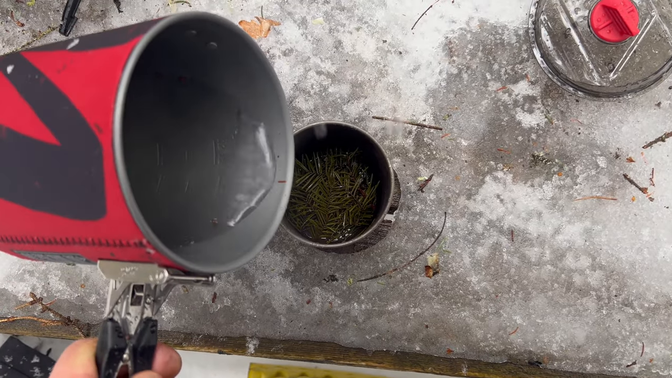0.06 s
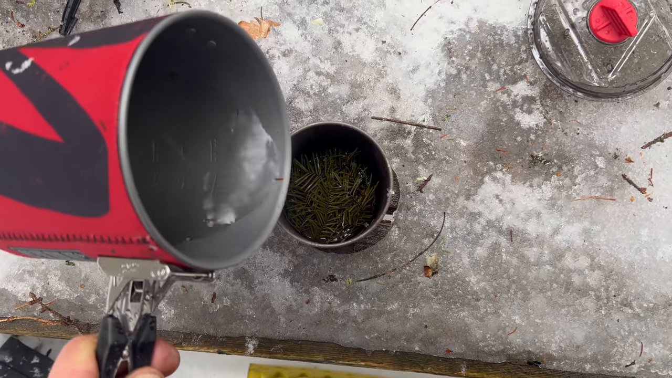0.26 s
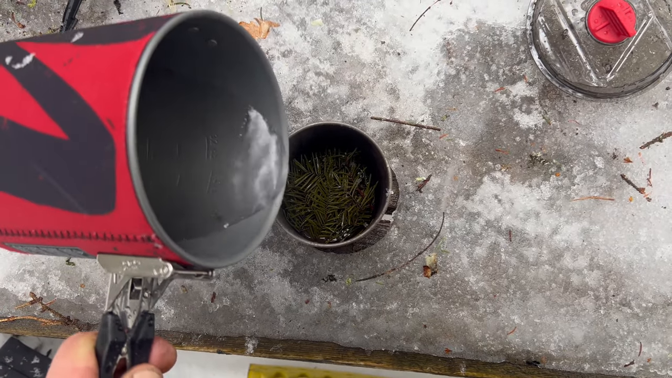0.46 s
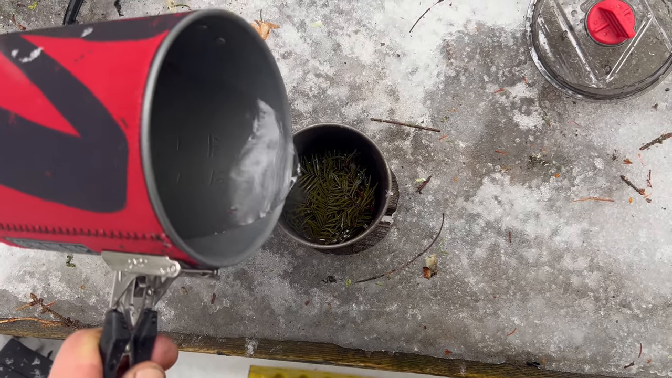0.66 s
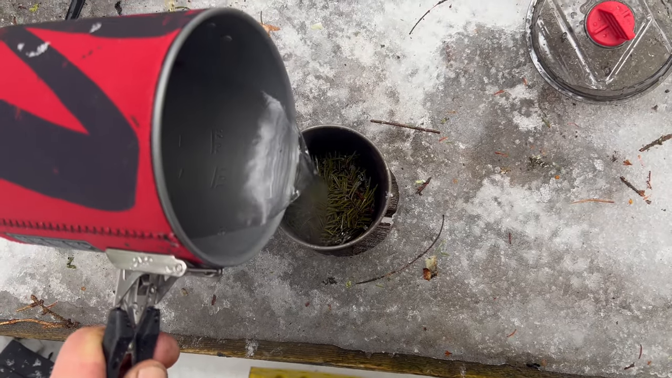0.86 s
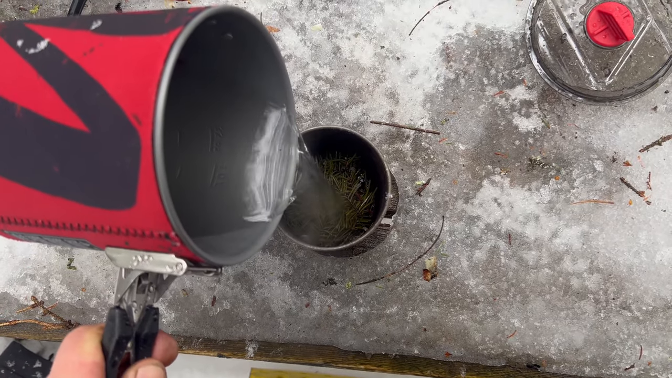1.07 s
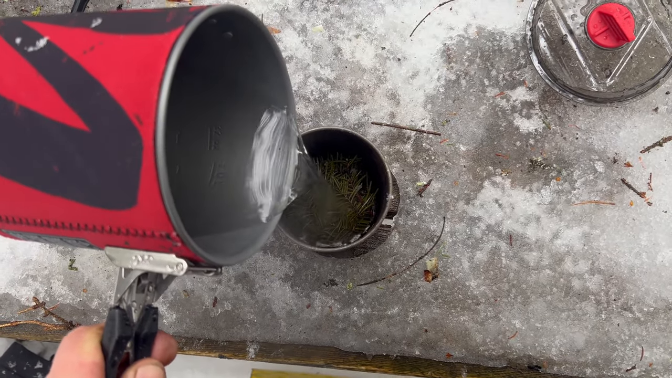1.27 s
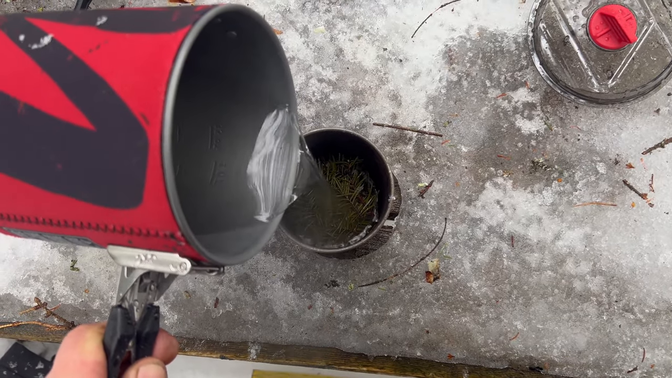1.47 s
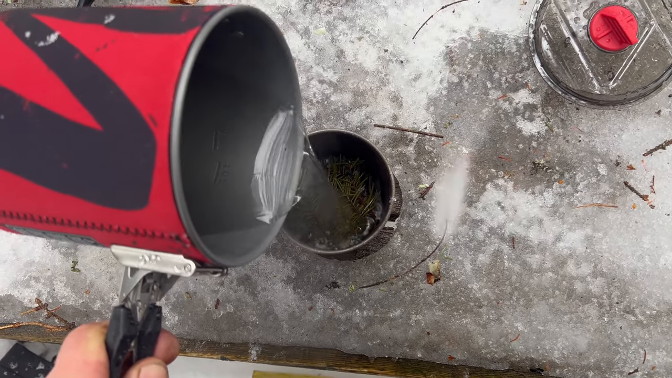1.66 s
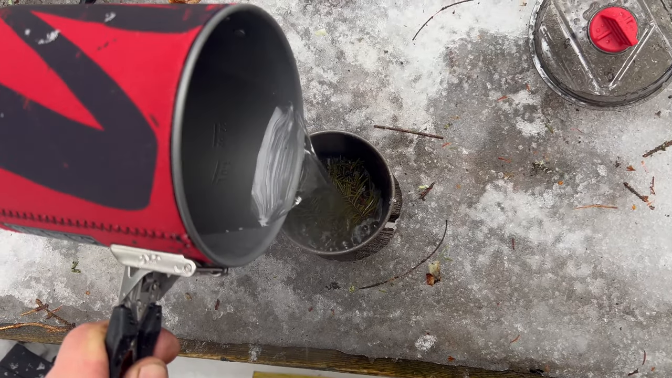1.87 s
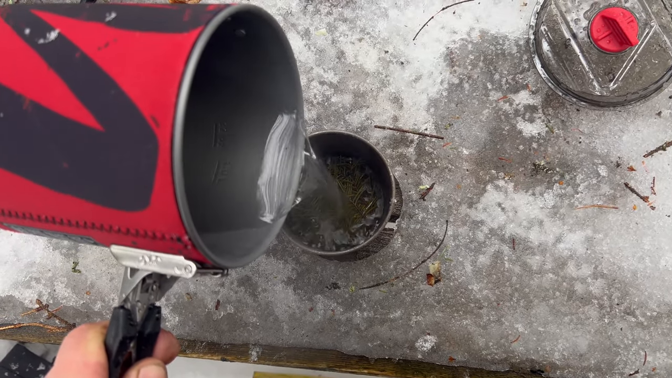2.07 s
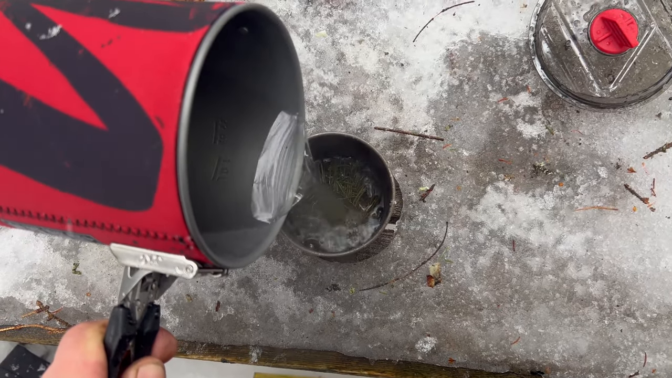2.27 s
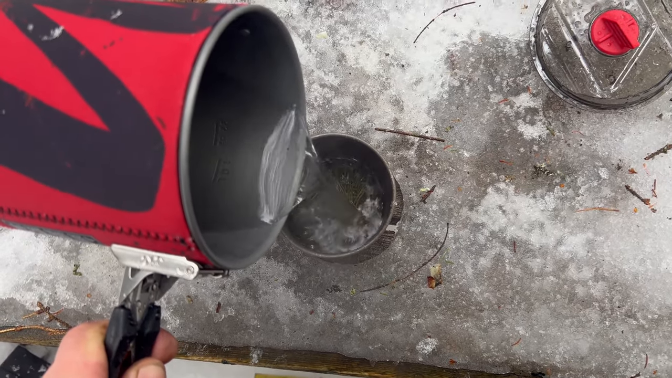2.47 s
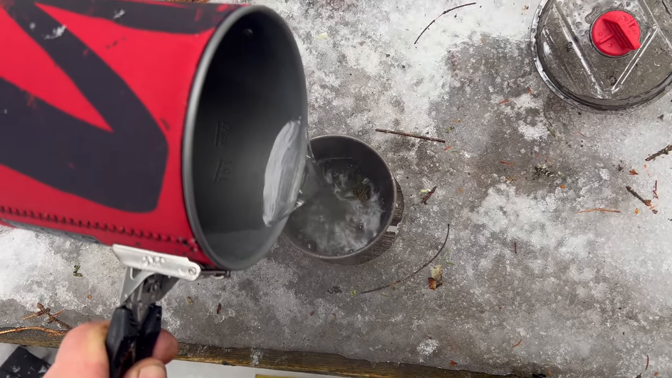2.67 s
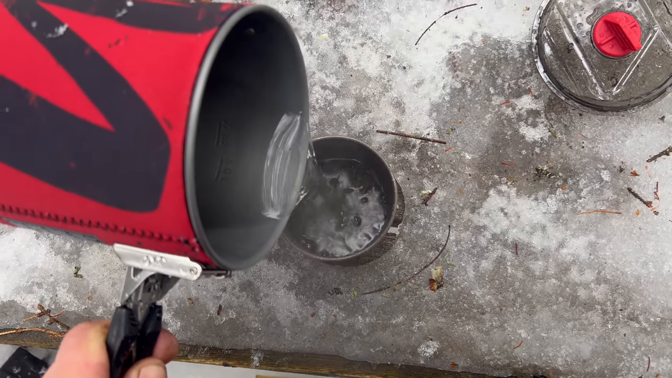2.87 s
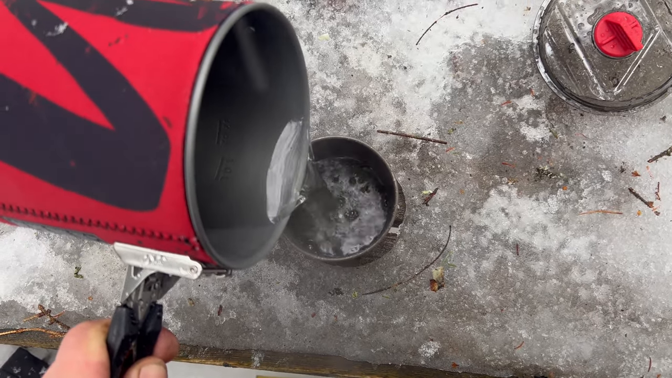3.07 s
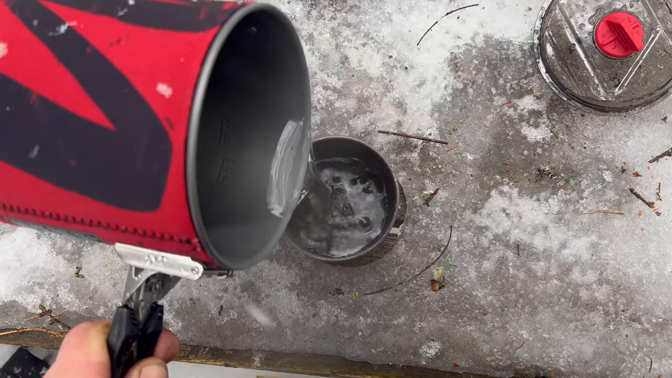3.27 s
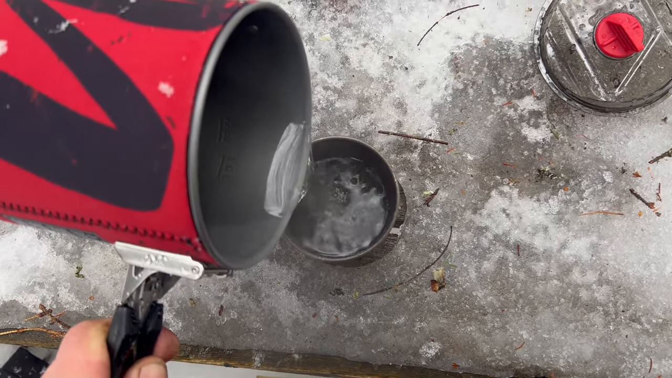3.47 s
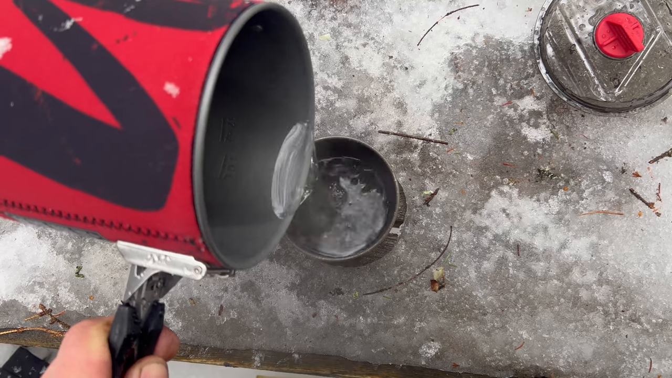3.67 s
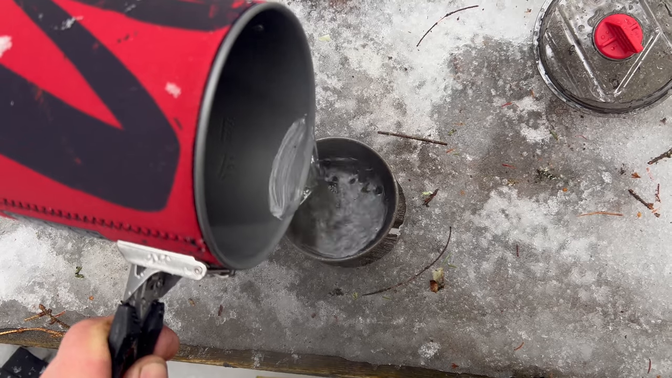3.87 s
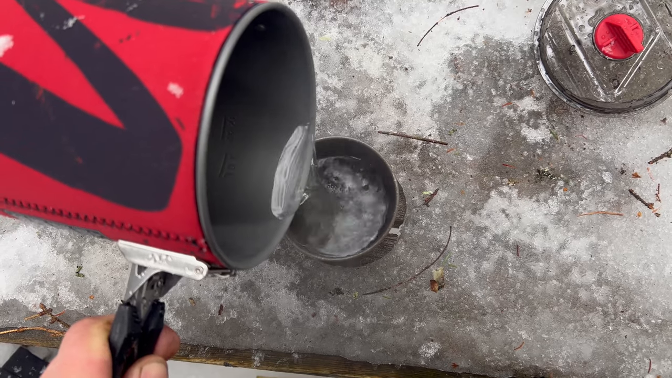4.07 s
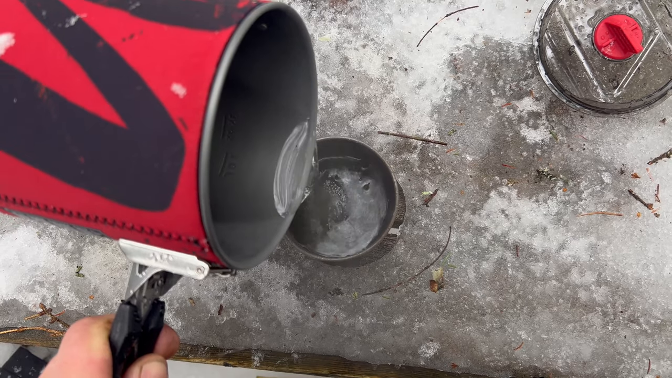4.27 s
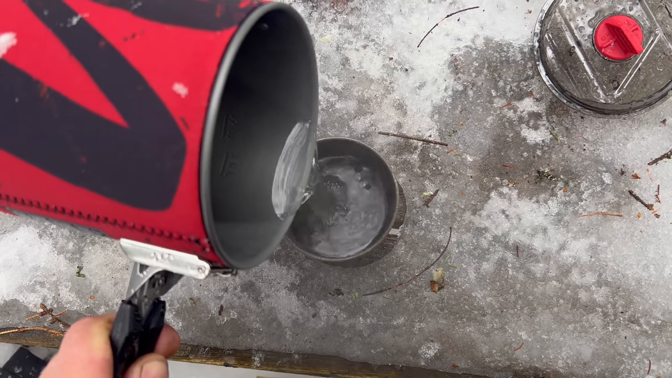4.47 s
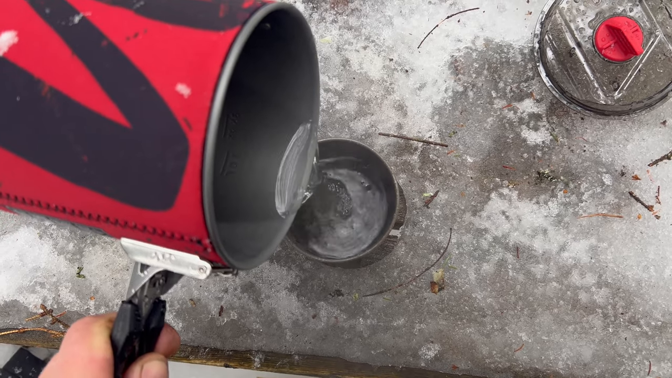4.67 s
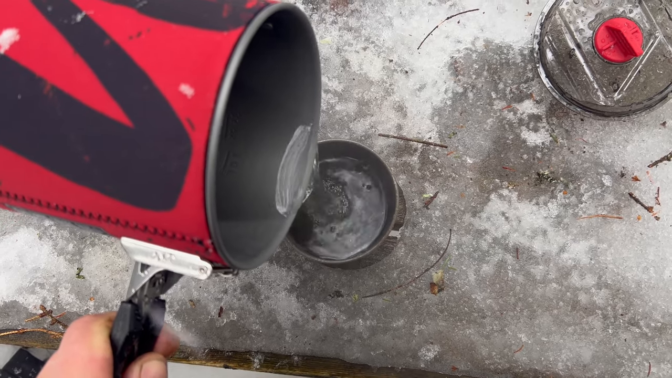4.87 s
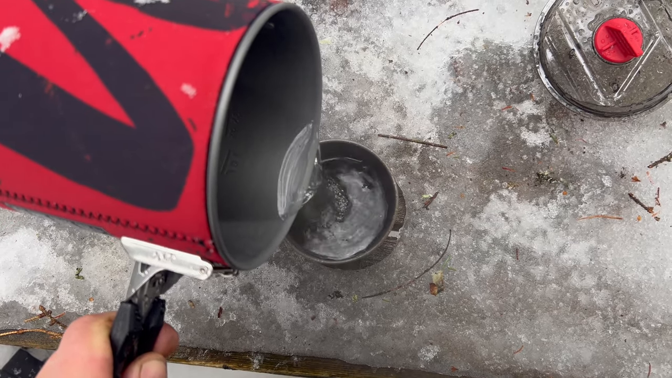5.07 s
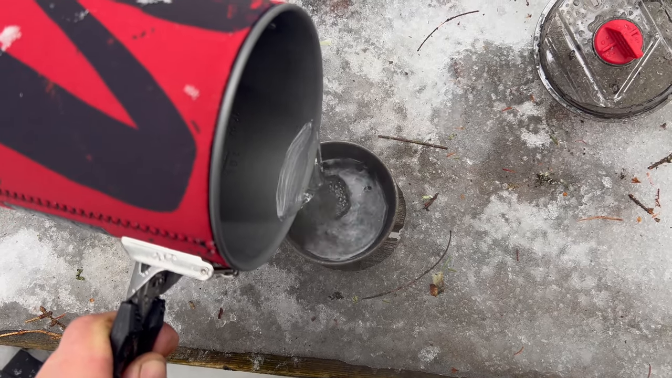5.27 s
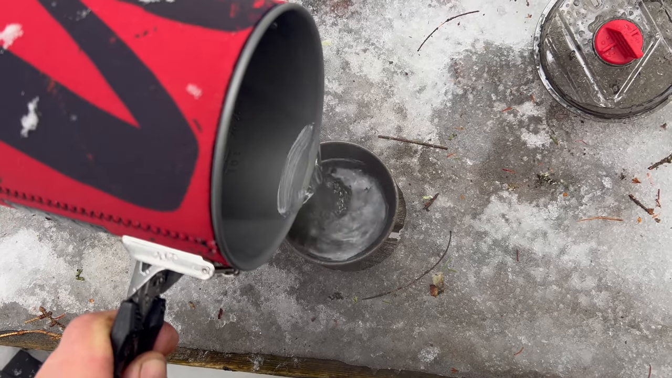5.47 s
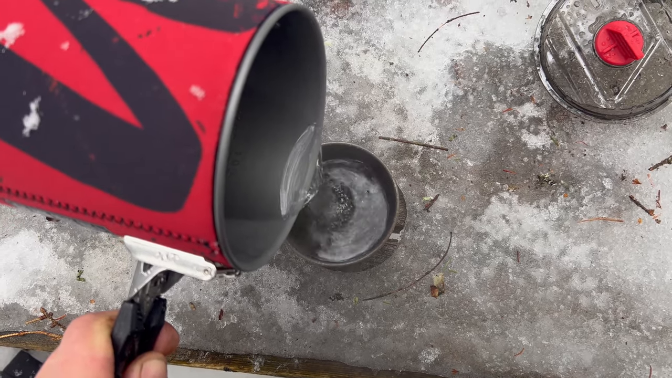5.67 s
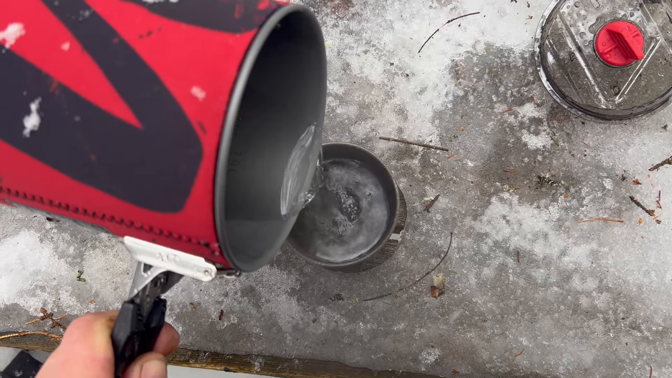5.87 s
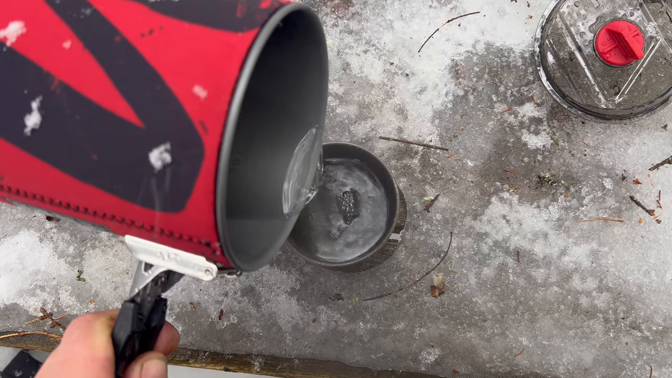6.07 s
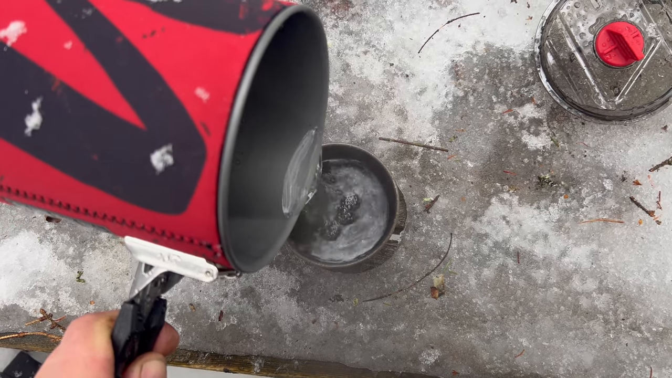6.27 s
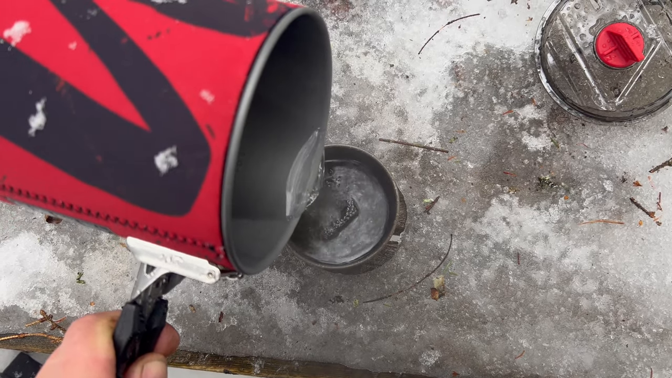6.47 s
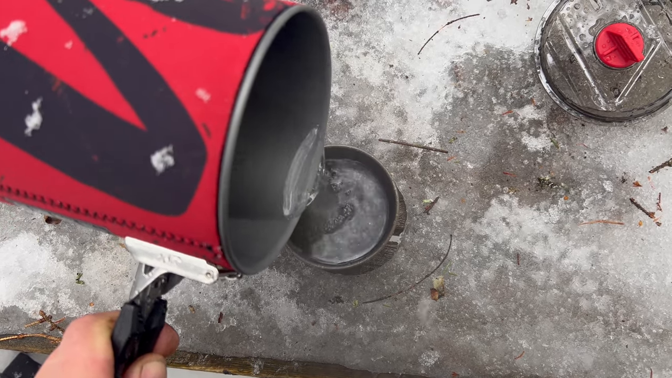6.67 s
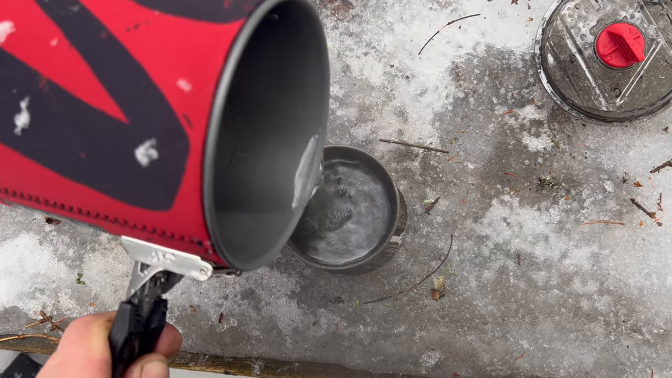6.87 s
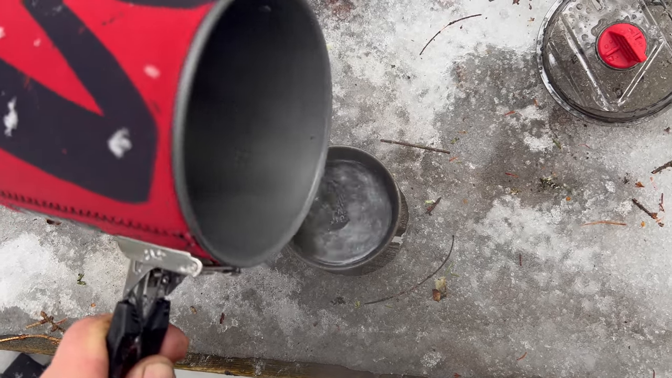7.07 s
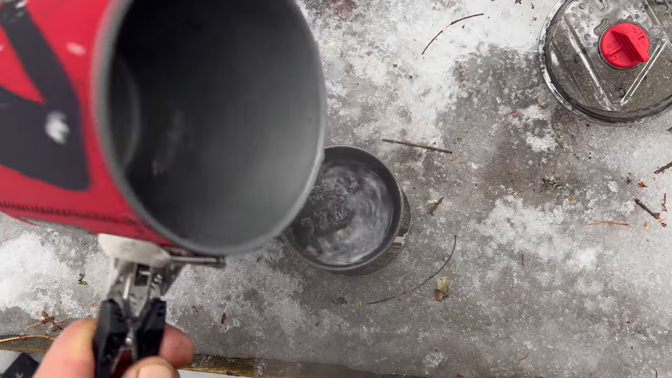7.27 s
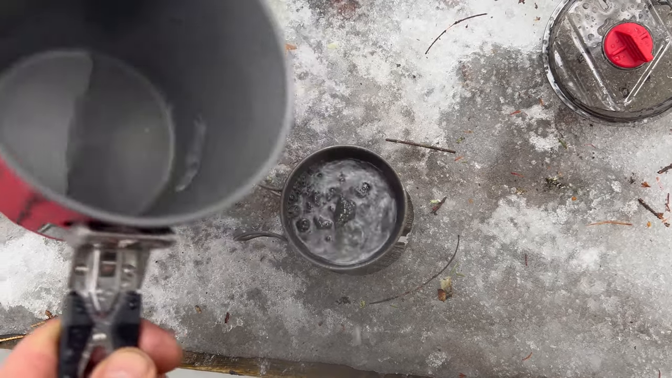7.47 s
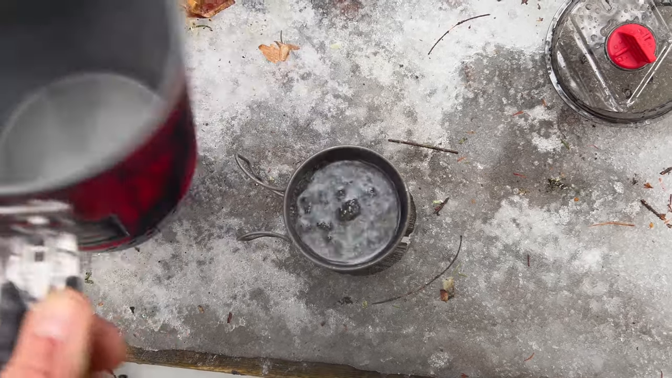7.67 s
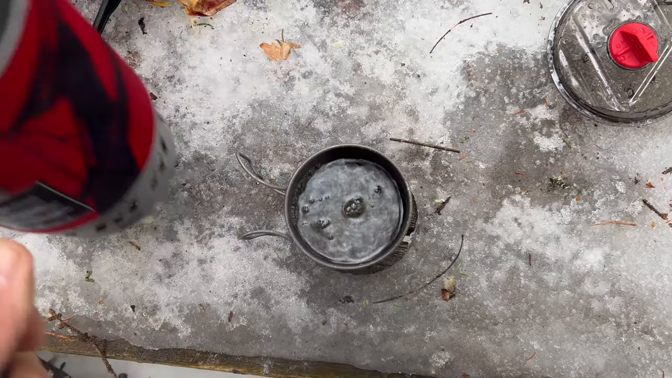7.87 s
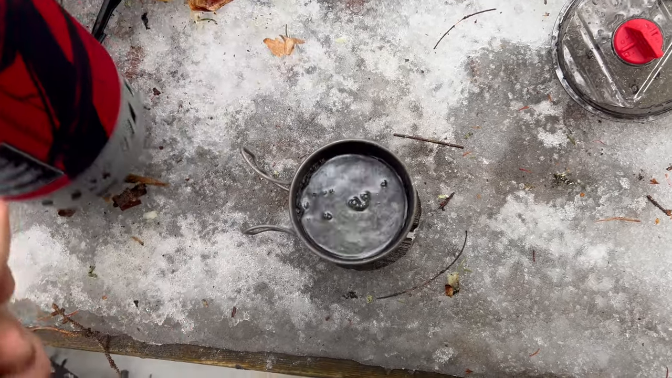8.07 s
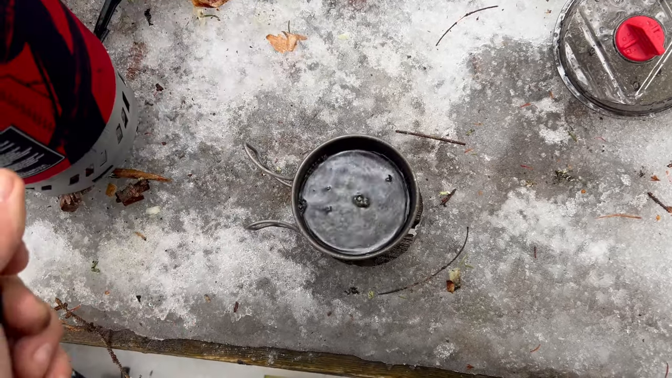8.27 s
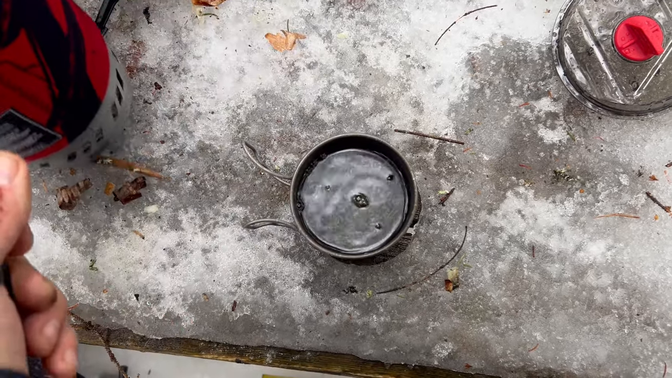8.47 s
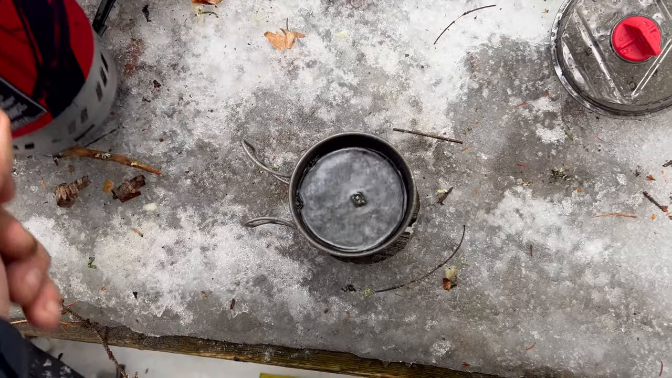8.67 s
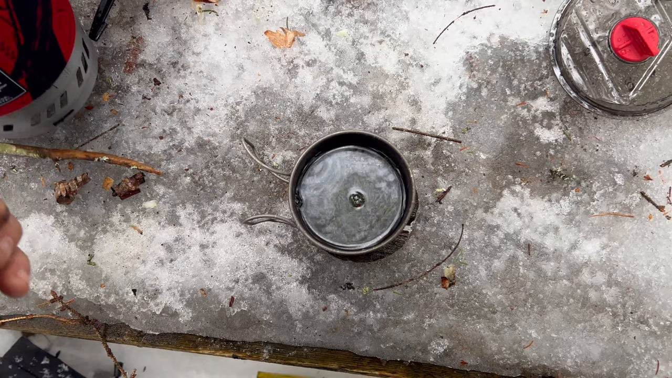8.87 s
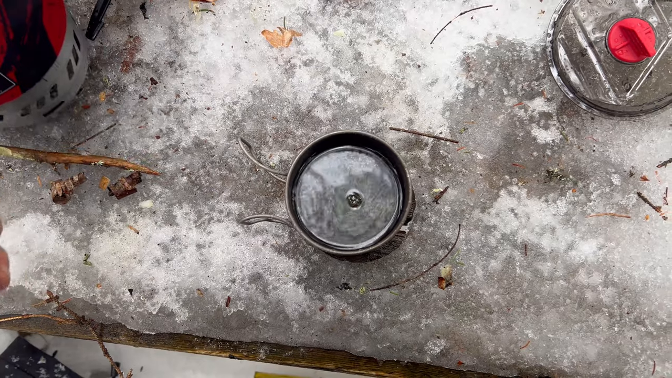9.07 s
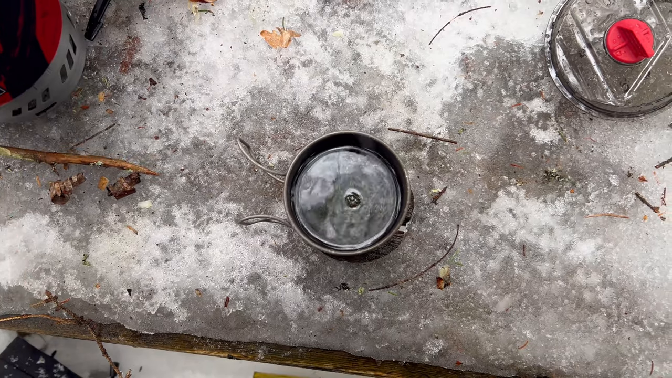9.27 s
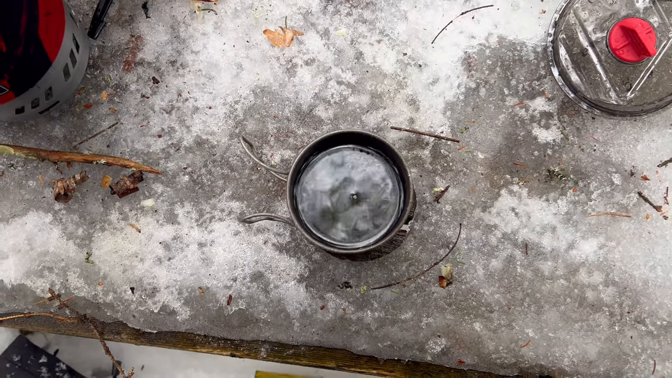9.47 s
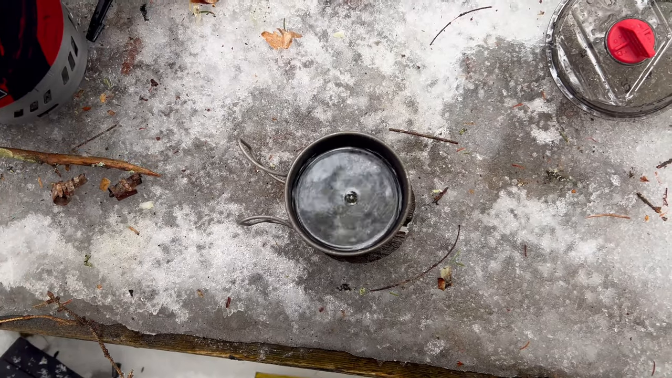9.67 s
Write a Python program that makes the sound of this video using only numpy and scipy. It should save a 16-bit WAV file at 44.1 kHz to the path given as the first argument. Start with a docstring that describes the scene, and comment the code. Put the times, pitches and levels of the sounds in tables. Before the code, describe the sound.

Water drips, then pours bubbling into a metal mug, before a metal pot is set down with a thump and short ring.

```python
"""A faint hush of winter air and a rustling sleeve open the scene and stay under it. Hot water starts to
drip from a pot into a metal mug, with small ticks and spray. Near 2.7 s a lump drops in with a loud plop,
and the stream gets going: pockets of trapped air ring as short bubbles, their pitch rising as the mug fills.
After about 7 s the pour thins to drips. Near 9 s the pot is set down with a thump, a scrape and a short ring."""
import sys
import numpy as np
from scipy import signal
from scipy.fft import rfft, irfft
from scipy.io import wavfile
from scipy.ndimage import uniform_filter1d

SR = 44100
rng = np.random.default_rng(int(sys.argv[2]) if len(sys.argv) > 2 else 0)


def wav_record(signal):
    """Record a signal, one row per channel, as 16-bit PCM in the file named by sys.argv[1]."""
    frames = np.transpose(np.atleast_2d(signal))
    bounded = np.clip(frames, -1, 1)
    # unit amplitude maps onto the largest positive 16-bit level
    quanta = np.round(bounded * 32767).astype(np.int16)
    wavfile.write(sys.argv[1], SR, quanta)


N = 429093
BUBBLE_PEAK_S = 0.004  # a bubble is loudest this long after it starts


def amp(db):
    """Turns a level in dB into a number to multiply a sound by."""
    return 10 ** (np.asarray(db) / 20)


def unit_level(x):
    """Scales a signal so that its average strength (rms) is 1."""
    return x / np.sqrt(np.mean(x ** 2) + 1e-20)


def curves(rows):
    """Joins the rows of a timed table with straight lines: one curve for each column after the time."""
    times, *columns = np.transpose(rows)
    return [np.interp(np.arange(N) / SR, times, column) for column in columns]


def add(mix, start_s, sound):
    """Mixes a sound in at the given time."""
    part = mix[round(start_s * SR):][:len(sound)]
    part += sound[:len(part)]


def pouring(start_s=0.072, end_s=7.2, fade_s=0.71):
    """Fades up to 1 while water runs into the mug, then back to 0."""
    t = np.arange(N) / SR
    return np.clip(np.minimum(t - start_s, end_s - t) / fade_s, 0, 1)


def ring_boost_db(hz, rings):
    """Metal makes the pitches near each of its own ringing notes louder."""
    return sum(boost_db / (1 + (2 * (hz - centre) / width) ** 2) for centre, width, boost_db in rings)


def noise(colour, patchy_db, flicker_db, size=512, rings=()):
    """Noise with a given tone colour: patches of pitch swell and fade, and the whole of it flickers."""
    frames, hz = 4 * N // size + 5, np.fft.rfftfreq(size, 1 / SR)
    real, imag, patches = rng.standard_normal((frames, len(hz), 3)).T
    patches = uniform_filter1d(patches, size=8, axis=0)  # smooth across pitch
    patches = unit_level(uniform_filter1d(patches, size=12, axis=1))  # and across time
    flicker = unit_level(uniform_filter1d(rng.standard_normal(frames), size=3))
    points_hz, points_db = np.transpose(colour)
    colour_db = np.interp(np.log(hz + 1), np.log(points_hz), points_db, left=-80)
    colour_db += ring_boost_db(hz, rings)
    spectra = (real + 1j * imag) * amp(colour_db[:, None] + patchy_db * patches + flicker_db * flicker)
    return unit_level(signal.istft(spectra, nperseg=size, noverlap=3 * size // 4)[1][:N])


def bubble(hz, rise_s=0.0016, fall_s=0.0011):
    """One pocket of air rings for a few cycles; its swell, fade and pitch slide vary by chance."""
    t = np.arange(900) / SR - BUBBLE_PEAK_S
    onset, length, slide, phase = rng.random(4)
    swell = np.exp(-(t / (rise_s * (0.5 + onset))) ** 2)
    fade = np.exp(-(abs(t) / (fall_s * (0.7 + 0.58 * length))) ** 0.88)
    cycles = hz * t * (1 + 8 * (slide - 0.3) * t)
    return np.where(t < 0, swell, fade) * np.sin(2 * np.pi * (cycles + phase))


def tick(hz, octaves, fade_s=0.016, rise_s=0.00042, rings=()):
    """One droplet hits: a tiny burst of noise around one pitch, with no bass."""
    t, f = np.arange(1024) / SR, np.fft.rfftfreq(1024, 1 / SR)
    band = np.exp(-0.5 * (np.log2((f + 1) / hz) / (0.5 * octaves)) ** 2)
    broad_hiss = 0.26 / (1 + (f / 9000) ** 2)
    bass_cut = 1 / (1 + (1400 / (f + 1)) ** 4)
    colour = (band + broad_hiss) * amp(ring_boost_db(f, rings)) * bass_cut
    envelope = (1 - np.exp(-(t / rise_s) ** 2)) * amp(-60 * t / fade_s)
    burst = irfft(rfft(rng.standard_normal(1024)) * colour) * envelope
    return burst / abs(burst).max()


def blip(hz, fade_cycles, rise_cycles, slide):
    """A short tone that swells, fades and slides in pitch (a slide of -0.1 ends 10% lower)."""
    fade_s = fade_cycles / hz
    t = np.arange(round(fade_s * SR) + 200) / SR
    envelope = (1 - np.exp(-(t * hz / rise_cycles) ** 2)) * amp(-60 * t / fade_s)
    bent_time = t + slide * (t + 0.125 * fade_s * np.expm1(-t / (0.11 * fade_s)))
    return envelope / envelope.max() * np.sin(2 * np.pi * hz * bent_time)


# How loud the background is: (time [s], hiss level [dB], rumble level [dB], air level [dB])
BACKGROUND_LEVELS = [(0.0, -69, -58.5, -61.5), (1.3, -63, -58, -61), (2.63, -63, -60, -63.5),
                     (3.74, -64, -57, -59), (4.74, -62, -58.5, -60.5), (6.64, -67.5, -59.5, -63),
                     (6.94, -63.5, -60, -61.5), (7.26, -56.5, -54.5, -56.5), (8.48, -66, -58, -56.5),
                     (8.99, -53, -48.5, -56.5), (9.29, -65, -57, -61.5), (9.73, -67, -61.5, -60.5)]
# Tone colours of the sleeve, the water, the grip and the open air: (pitch [Hz], relative level [dB])
SLEEVE_COLOUR = [(800, -70), (2000, 6), (3700, 2), (5500, -4.5), (7700, 4.5), (9500, -4), (11000, 3.5),
                 (16000, -6.5)]
FIZZ_COLOUR = [(1500, -19), (2600, -11), (4500, -11), (8000, -5), (10000, -11), (11000, -4), (16000, -3)]
GRIP_COLOUR = [(32, -40), (40, -5.5), (100, -4.5), (250, -5), (350, -11.5), (500, -26.5), (900, -46)]
AIR_COLOUR = [(200, -10), (450, 1.5), (1000, 0), (1900, -0.5), (2500, -8), (3300, -21.5), (9000, -24),
              (16000, -69)]
# The notes at which the metal mug rings: (pitch [Hz], width [Hz], boost [dB])
MUG_RINGS = [(3750, 250, 9), (5750, 200, 9), (7300, 250, 4), (8900, 280, 8)]


def background():
    """The sleeve rustles, water fizzes in the mug, the grip on the pot rumbles and the air hushes."""
    hiss_db, rumble_db, air_db = curves(BACKGROUND_LEVELS)
    sleeve = noise(SLEEVE_COLOUR, patchy_db=4.5, flicker_db=0.7, size=256)
    fizz = noise(FIZZ_COLOUR, patchy_db=3.5, flicker_db=6.5, rings=MUG_RINGS)
    fizz_share = 0.9 * pouring()  # while water runs, most of the hiss comes from the mug
    hiss = np.sqrt(1 - fizz_share) * sleeve + np.sqrt(fizz_share) * fizz
    rumble = noise(GRIP_COLOUR, patchy_db=1.4, flicker_db=2.0, size=2048)
    air = noise(AIR_COLOUR, patchy_db=1.65, flicker_db=2.0)
    return amp(hiss_db) * hiss + amp(rumble_db) * rumble + amp(air_db) * air


# The stream, faint at first and at the end: (time [s], level [dB], note of the air in the mug [Hz])
WATER_FLOW = [(0, -83, 1920), (1.1, -68, 1840), (2.55, -73.5, 1880), (2.7, -61, 1647), (2.79, -53, 1220),
              (3.14, -48.5, 1240), (3.9, -51, 1310), (4.2, -58.5, 1370), (4.5, -51.5, 1385),
              (5.2, -50, 1455), (5.6, -48.5, 1553), (5.8, -56, 1480), (6.3, -54.5, 1564),
              (6.75, -57.5, 1407), (6.9, -65, 1560), (7.05, -58, 1483), (7.22, -67, 1410),
              (7.32, -58, 2020), (7.7, -64, 1980), (8.3, -70, 2070), (9.73, -75, 2020)]


def stream(gap_s=0.0125, pitch_spread=0.07, size_range_db=10, gurgle_db=2.5, splash_db=-5):
    """Falling water traps small bubbles; each rings near the note of the air in the mug, with a splash."""
    level_db, mug_hz = curves(WATER_FLOW)
    gurgle = unit_level(uniform_filter1d(rng.standard_normal(N), round(0.06 * SR)))  # random swells
    out = np.zeros(N)
    count = int(N / SR / gap_s) - 2
    for k, (late, size, pitch, splash_pitch) in enumerate(rng.random((count, 4))):
        at = int((k + 0.85 * late) * gap_s * SR)
        hz = mug_hz[at] * (1 + pitch_spread * (2 * pitch - 1))
        tone = bubble(hz, rise_s=0.0012, fall_s=0.0028)
        splash = amp(splash_db) * bubble(hz * (0.74 + 0.7 * splash_pitch), rise_s=0.00052, fall_s=0.0017)
        add(out, at / SR, amp(size_range_db * size + gurgle_db * gurgle[at]) * (tone + splash))
    return amp(level_db) * unit_level(out)


# Short spells of spray or scraping: (time [s], length [s], level [dB])
SCRAPE_SPELLS = [(0.059, 0.024, -57.5), (0.934, 0.34, -62), (1.786, 0.042, -53), (2.703, 0.099, -49),
                 (4.264, 0.16, -54.5), (6.865, 0.031, -53.5), (7.32, 0.25, -53), (7.963, 0.088, -58),
                 (8.129, 0.034, -53), (8.437, 0.094, -55), (8.818, 0.11, -43.5), (8.892, 0.016, -31.5),
                 (8.99, 0.066, -51.5), (9.058, 0.095, -50.5), (9.239, 0.13, -53.5)]
# Their tone colour: (pitch [Hz], relative level [dB])
SCRAPE_COLOUR = [(300, 5), (1000, 8.5), (2200, 5), (3500, 6.5), (6000, 0), (7700, 11.5), (9300, -4),
                 (10800, 6), (16000, -16)]


def spray_and_scrapes():
    """Each spell is a hiss that swells and fades, coloured by the notes of the thin metal pot."""
    level = np.zeros(N)
    for time_s, length_s, db in SCRAPE_SPELLS:
        progress = np.linspace(0, 1, round(length_s * SR))
        add(level, time_s, amp(db) * np.sin(np.pi * progress ** 0.94) ** 0.5)
    rings = [(hz, 90, 6.5) for hz, *_ in POT_NOTES]  # 90 Hz wide, 6.5 dB boost
    return level * noise(SCRAPE_COLOUR, patchy_db=2.5, flicker_db=2.5, rings=rings)


# Splashes and ticks that stand out: (time [s], peak level [dB], pitch [Hz])
DROPLET_HITS = [(0.6545, -46, 11300), (0.704, -45.5, 7740), (0.764, -44, 8900), (0.777, -41.5, 7900),
                (0.81, -45, 8300), (0.827, -40, 8100), (1.044, -42, 4100), (1.1027, -43, 7600),
                (1.122, -42, 9440), (1.164, -40, 7640), (1.214, -42.5, 7840), (1.238, -45, 9100),
                (1.257, -36, 8600), (1.281, -46, 9200), (1.318, -43, 11600), (1.425, -51, 3870),
                (1.464, -46, 7850), (1.771, -46, 11000), (1.785, -36.5, 6900), (1.7957, -31.5, 8240),
                (1.813, -40.5, 7400), (2.4638, -43, 10400), (2.7122, -20.5, 3360), (3.246, -42, 9400),
                (3.3527, -42, 3280), (3.4056, -38.5, 8750), (3.6272, -26, 7960), (3.7896, -41, 12500),
                (4.05, -34.5, 4840), (4.3133, -31, 7660), (4.3703, -36, 8360), (4.556, -34.5, 7760),
                (4.6383, -36.5, 13600), (4.7413, -35, 11100), (4.8625, -31.5, 14900),
                (5.1015, -35.5, 15000), (5.41, -30.5, 11300), (6.1329, -41, 3980), (6.374, -36, 13300),
                (6.813, -40.5, 2660), (6.878, -32.5, 7600), (6.892, -37.5, 6000), (7.0305, -23, 7660),
                (7.123, -30.5, 3710), (7.15, -35, 13600), (7.202, -34, 3430), (7.3496, -23.5, 4400),
                (7.434, -35.5, 2870), (7.466, -36, 2200), (7.959, -35, 8440), (8.1485, -44, 2860),
                (8.2207, -35.5, 12700), (8.485, -34.5, 3560), (8.7845, -25, 3700), (8.862, -27, 8230),
                (8.88, -23, 6780), (8.8951, -12.5, 7590), (9.254, -21, 7400), (9.5187, -40.5, 7400)]


def droplets(faint_count=520, faint_db=-62, usual_hiss_db=-66):
    """Droplets splash and tick; many faint ones ring the mug, growing with the pour and the hiss."""
    out = np.zeros(N)
    for time_s, db, hz in DROPLET_HITS:
        octaves = max(0.81 + 0.36 * (db + 35), 0.3)  # louder ticks cover more pitches
        add(out, time_s, amp(db) * tick(hz, octaves))
    hiss_db = curves(BACKGROUND_LEVELS)[0]
    swell_db = 3.6 * pouring() + 0.71 * (hiss_db - usual_hiss_db)
    for when, smallness, pitch, width in rng.random((faint_count, 4)):
        db = faint_db + swell_db[int(when * N)] - 6.5 * np.log(smallness + 1 / 15)
        hit = tick(5500 * 2.6 ** pitch, 0.49 + 3.6 * width, fade_s=0.0046, rise_s=0.0012, rings=MUG_RINGS)
        add(out, when * N / SR, amp(db) * hit)
    return out


# Lumps dropping into the mug:
# (time [s], peak level [dB], starting pitch [Hz], length [cycles], pitch slide [fraction])
LUMP_DROPS = [(0.654, -44, 2200, 15, -0.06), (1.797, -35, 1700, 4.3, -0.18), (2.7098, -23, 1210, 11, 0.33),
              (2.7115, -8.5, 1700, 8.7, -0.083), (2.7109, -31.5, 700, 22, -0.97),
              (3.628, -20, 680, 4.5, -0.46), (4.342, -32.5, 1090, 31, -.8), (4.799, -41.5, 790, 15, -0.57)]


def lumps():
    """A lump breaks the surface with a dull plop: a short tone that usually sinks in pitch."""
    out = np.zeros(N)
    for time_s, db, hz, cycles, slide in LUMP_DROPS:
        add(out, time_s, amp(db) * blip(hz, cycles, rise_cycles=min(0.07 * cycles, 0.9), slide=slide))
    return out


# The bubbles that stand out from the stream: (time of the peak [s], peak level [dB])
LOUD_BUBBLES = [(2.7987, -33.5), (2.8425, -29), (2.923, -35), (2.986, -30), (3.027, -43), (3.031, -37),
                (3.0574, -49), (3.075, -30), (3.099, -45), (3.132, -40), (3.163, -33), (3.181, -24.5),
                (3.199, -34), (3.222, -31), (3.233, -34), (3.253, -38), (3.269, -42), (3.281, -40),
                (3.2988, -34.5), (3.353, -43), (3.4103, -32.5), (3.435, -41), (3.4417, -33), (3.652, -26),
                (3.7082, -32), (3.754, -34), (3.9258, -27), (3.958, -32.5), (3.9856, -27), (3.9992, -30),
                (4.0542, -33), (4.087, -31), (4.1612, -36.5), (4.325, -35), (4.3741, -30), (4.387, -35),
                (4.409, -29.5), (4.424, -32.5), (4.4688, -28.5), (4.482, -32), (4.501, -37), (4.5328, -28),
                (4.5659, -29), (4.608, -33.5), (4.637, -26), (4.6488, -29.5), (4.665, -36), (4.691, -31.5),
                (4.748, -37), (4.784, -38), (4.811, -25.5), (4.8659, -29), (4.884, -48), (4.991, -34),
                (5.043, -31.5), (5.0756, -35), (5.103, -30.5), (5.1646, -29.5), (5.2866, -35),
                (5.309, -32.5), (5.3635, -31.5), (5.4394, -30.5), (5.522, -31), (5.591, -30.5),
                (5.6087, -29.5), (5.667, -33.5), (5.8557, -32), (5.87, -28.5), (6.101, -32), (6.168, -35),
                (6.219, -38), (6.2555, -26.5), (6.487, -33.5), (6.656, -27.5), (6.745, -34.5), (6.773, -38),
                (6.785, -36.5), (6.976, -36), (6.9966, -32), (7.01, -32.5), (7.0241, -29), (7.052, -23.5),
                (7.068, -26), (7.086, -40), (7.097, -26), (7.1175, -23.5), (7.126, -26), (7.158, -29.5),
                (7.2034, -28), (7.214, -28.5), (7.437, -34.5), (7.55, -33.5), (7.6554, -38)]


def loud_bubbles(pitch_spread=0.0082, splash_db=-6, glug_db=-22.5, snap_db=-13):
    """Trapped air rings at the mug's note, with a splash, a low glug, a smaller bubble and maybe a snap."""
    out, mug_hz = np.zeros(N), curves(WATER_FLOW)[1]
    chances = rng.random((len(LOUD_BUBBLES), 6))
    for (peak_s, db), (late, smallness, pitch, softness, splash_pitch, tune) in zip(LOUD_BUBBLES, chances):
        start_s = peak_s - BUBBLE_PEAK_S
        hz = mug_hz[round(peak_s * SR)] * (1 + pitch_spread * (2 * tune - 1))
        add(out, start_s, amp(db) * bubble(hz))
        splash = bubble(hz * (0.95 + 0.6 * splash_pitch), rise_s=0.0005, fall_s=0.0015)
        add(out, start_s, amp(db + splash_db) * splash)
        glug = bubble(hz * (0.35 + 0.3 * late), fall_s=0.0031)
        add(out, start_s + 0.00192, amp(db + glug_db) * glug)
        follower = bubble(hz * (0.915 + 0.15 * pitch))
        follower_db = min(db - 13.5, -37) - 17 * smallness
        add(out, start_s + 0.0027 + 0.0048 * late, amp(follower_db) * follower)
        snap = tick(3500 * 4 ** smallness, octaves=0.9)
        add(out, peak_s - 0.001 + 0.0018 * splash_pitch, amp(db + snap_db - 54 * softness) * snap)
    return out


# Knocks of pot, handle and ground: (time [s], thump level [dB], thump pitch [Hz], ring level [dB])
POT_KNOCKS = [(7.306, -46.5, 95, -81), (7.445, -43.5, 88, -60.5), (8.491, -44, 164, -62),
              (8.786, -29.5, 1040, -46.5), (8.795, -28, 44, -58), (8.812, -30, 74, -63),
              (8.862, -18, 290, -42), (8.88, -18.5, 270, -76), (8.896, -39, 860, -50.5),
              (8.913, -23.5, 272, -46.5), (9.01, -35.5, 422, -58.5), (9.253, -40, 910, -55),
              (9.437, -39, 1350, -68.5), (9.721, -38, 724, -45.5)]
# The notes at which the pot rings: (pitch [Hz], relative level [dB], time to fade by 60 dB [s])
POT_NOTES = [(128.2, 5, 0.49), (281, 9, 0.13), (460, -4, 0.2), (893, -4, 0.29), (2097, -5, 0.17),
             (2300, -7, 0.14), (3240, -16, 0.15), (4300, -13, .17), (4760, -16, 0.5)]


def pot_knocks(detune=0.0102):
    """Each dull thump sets the thin pot ringing; its notes come in close pairs, so they waver."""
    out, t = np.zeros(N), np.arange(SR // 2) / SR
    for time_s, thump_db, thump_hz, ring_db in POT_KNOCKS:
        add(out, time_s, amp(thump_db) * blip(thump_hz, fade_cycles=14, rise_cycles=0.2, slide=-0.027))
        ring = np.zeros(len(t))
        for hz, db, fade_s in POT_NOTES + POT_NOTES:
            strength, tune = rng.standard_normal(2)
            envelope = amp(db + 2 * strength - 60 * t / fade_s)
            ring += envelope * np.sin(2 * np.pi * hz * (1 + detune * tune) * t)
        onset = 1 - np.exp(-t / 0.0048)
        add(out, time_s, amp(ring_db) * ring * onset)
    return out


def with_echo(sound, fade_s=0.15, db=-16):
    """Pot, mug and ground throw back a short, blurred echo."""
    t = np.arange(6000) / SR
    tail = rng.standard_normal(6000) * amp(-60 * t / fade_s) * (t > 0.002)
    return sound + amp(db) * signal.oaconvolve(sound, tail / np.linalg.norm(tail))[:N]


def scene():
    """Mixes the water and the pot, with their echo, over the background in one channel."""
    near = loud_bubbles() + stream() + lumps() + droplets() + pot_knocks() + spray_and_scrapes()
    return (with_echo(near) + background())[None]


def record(dry):
    """The microphone loses the bass below 36 Hz, and the recorder the treble above 15900 Hz."""
    bass_cut = signal.butter(4, 36, "high", fs=SR, output="sos")
    treble_cut = signal.firwin(511, 15900, window=("kaiser", 9), fs=SR)
    return signal.oaconvolve(signal.sosfilt(bass_cut, dry), treble_cut[None], "same")


dry = scene()
out = record(dry)
wav_record(out)
```